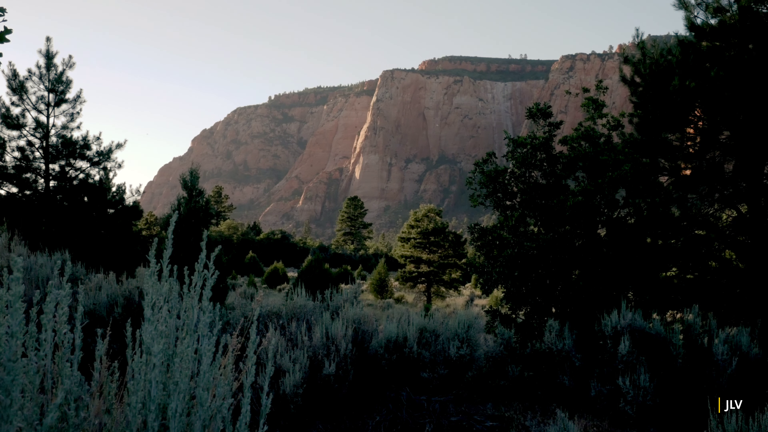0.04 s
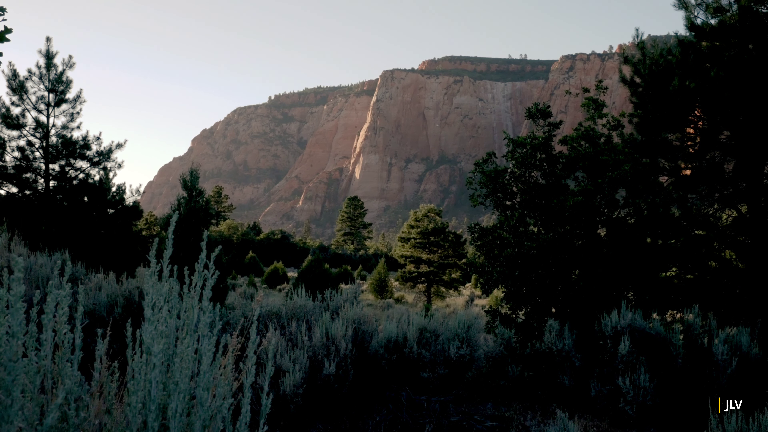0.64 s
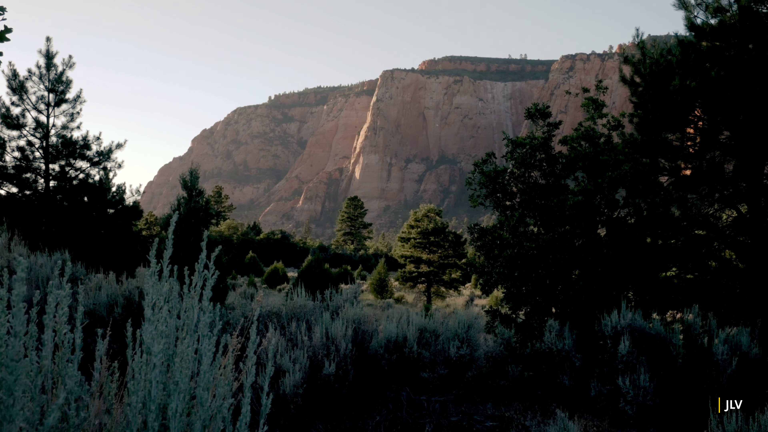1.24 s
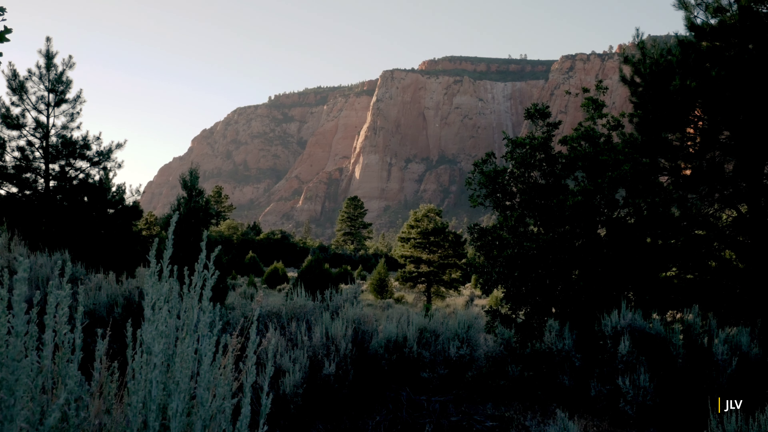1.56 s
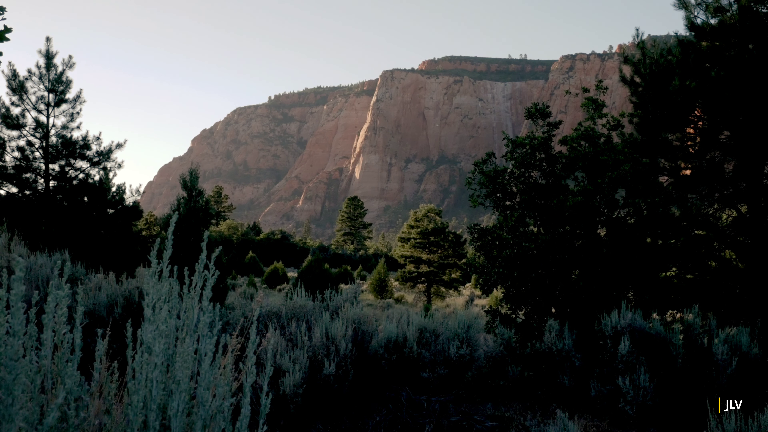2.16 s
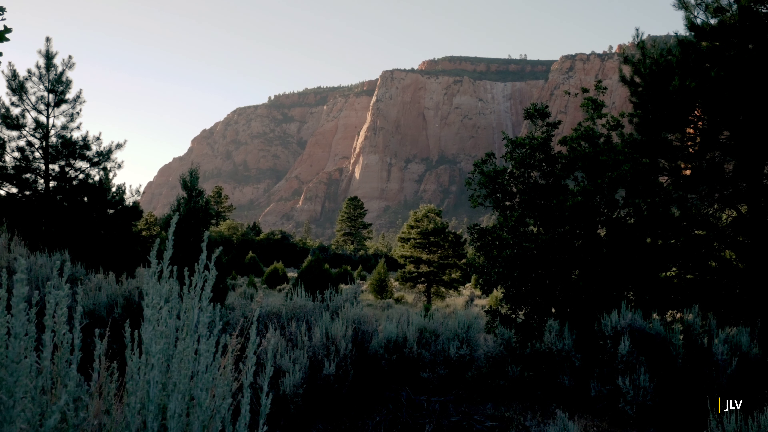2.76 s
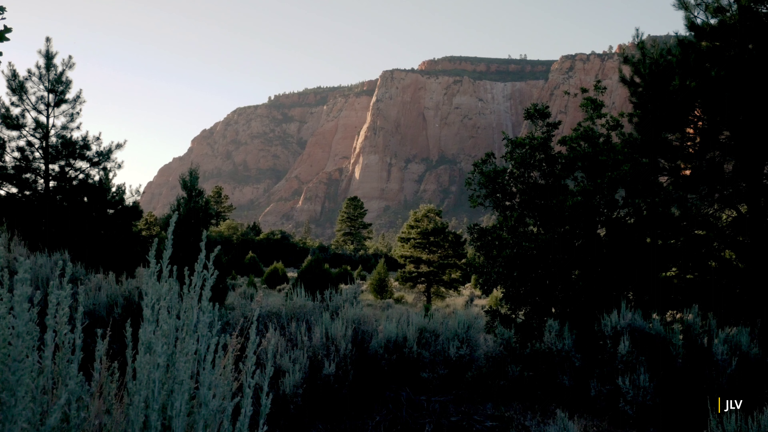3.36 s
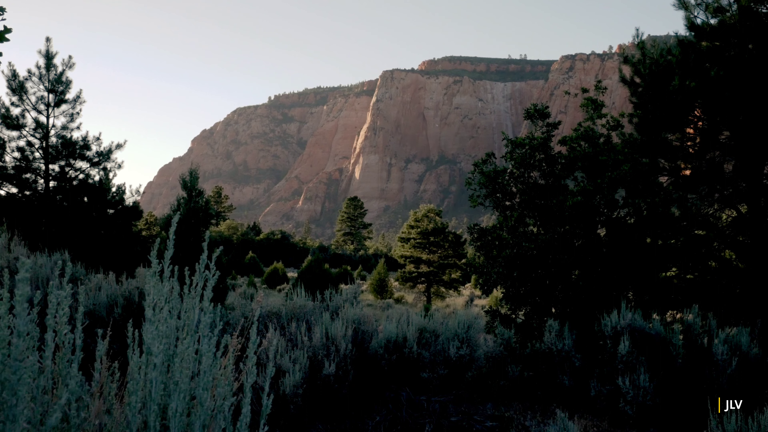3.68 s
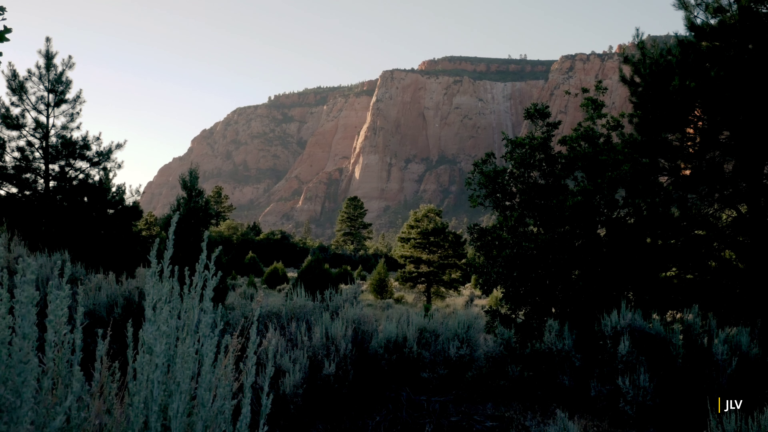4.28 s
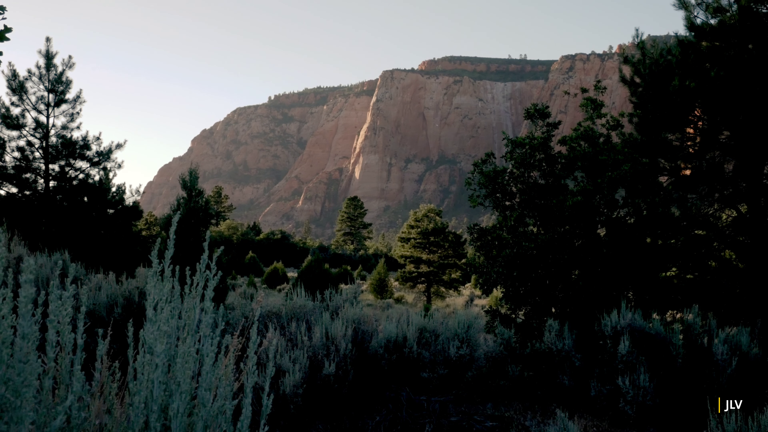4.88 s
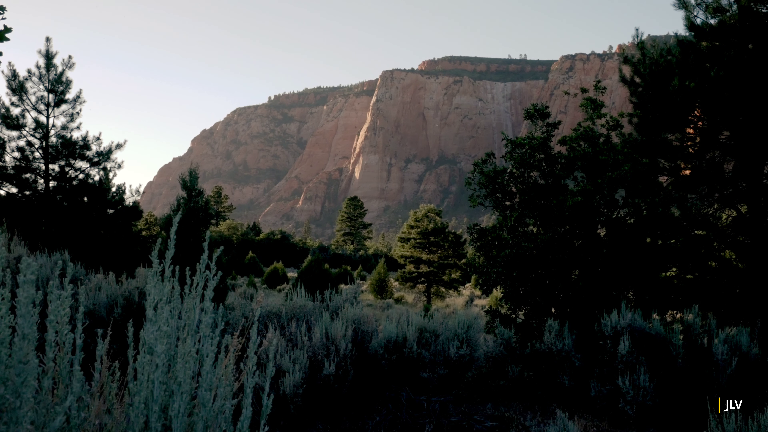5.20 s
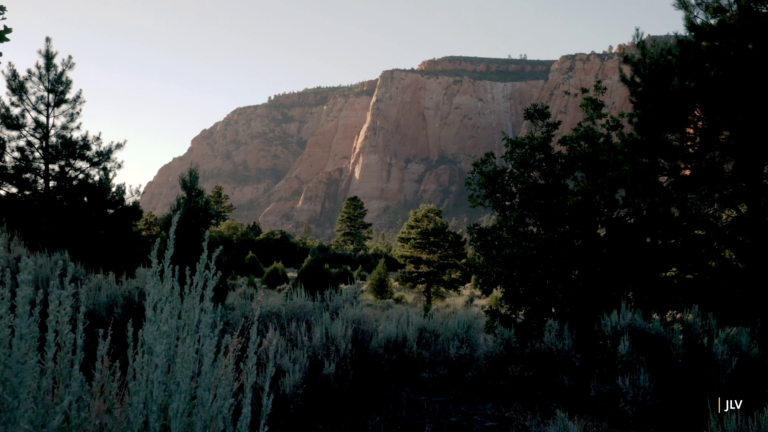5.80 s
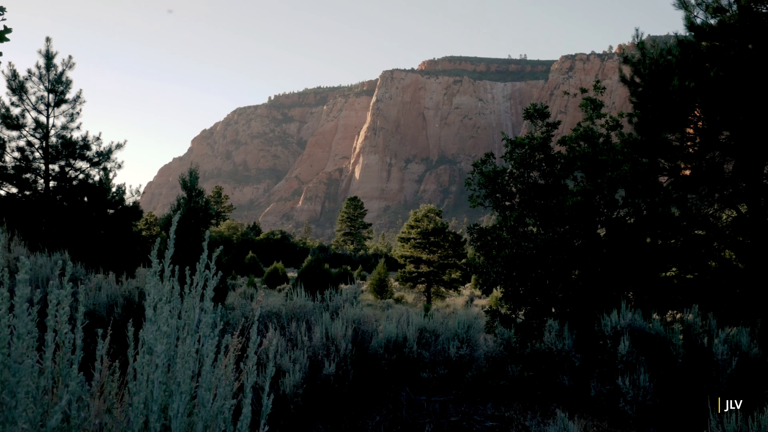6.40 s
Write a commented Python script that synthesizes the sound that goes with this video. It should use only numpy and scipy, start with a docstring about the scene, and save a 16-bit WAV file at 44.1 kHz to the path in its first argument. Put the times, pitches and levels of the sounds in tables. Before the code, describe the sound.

A faint cricket chirps at regular intervals among trees and brush, over steady microphone hiss, a soft wash of far-off air and a low hum. Wind begins to rumble on the microphone, growing into soft, irregular gusts. A small bird chirps twice in quick succession, each call rising and then dropping, while a distant one whistles two very faint notes. The canyon is very quiet, with its sounds toward the left.

```python
"""Faint far-off air, a low drone and a chirping cricket are heard first, in a quiet canyon.
Each chirp is four wing strokes that fall in pitch. From 1.5 s the eddies of a breeze buffet the
microphone. Near 4 s a small bird gives two rising, arched calls, one voice from each side of its
syrinx; a farther bird adds two faint notes. All lies to the left, over the recorder's even hiss."""
import sys
import numpy as np
from scipy import signal
from scipy.fft import rfft, irfft
from scipy.io import wavfile
from scipy.ndimage import uniform_filter1d

SR = 44100
rng = np.random.default_rng(int(sys.argv[2]) if len(sys.argv) > 2 else 0)


def inscribe(sig):
    """Save sig as 16-bit PCM at rate SR to the path in sys.argv[1].

    A 1-D sig is mono; a 2-D sig holds one channel per row.
    Samples are clipped to [-1, 1] before scaling.
    """
    pcm = np.round(np.clip(np.atleast_2d(sig).T, -1, 1) * 32767)
    wavfile.write(sys.argv[1], SR, pcm.astype(np.int16))


N = 284445
TIME, BINS = np.arange(N) / SR, np.fft.rfftfreq(N, 1 / SR)


def gain_of(db):
    """The decibel scale: 20 dB is a factor of ten in amplitude."""
    return 10 ** (np.asarray(db) / 20)


def colour(points):
    """Spectral envelope: a gain for each bin, from (Hz, dB) points joined along log frequency."""
    hz, db = np.transpose(points)
    return gain_of(np.interp(np.log(BINS + 1), np.log(hz + 1), db))


def coloured(x, gains):
    """Linear filtering: the spectrum is multiplied by the gains, and the result scaled to rms 1."""
    filtered = irfft(rfft(x) * gains, N)
    return filtered / np.sqrt(np.mean(filtered ** 2) + 1e-20)


def wander(bandwidth_hz):
    """Random modulation: low-passed noise of rms 1."""
    return coloured(rng.standard_normal(N), np.exp(-(BINS / bandwidth_hz) ** 2))


def add(mix, start_s, sound):
    """Superposition: a sound adds to the mix from start_s on."""
    part = mix[max(round(start_s * SR), 0):][:len(sound)]
    part += sound[:len(part)]


def whistle(hz, amplitude):
    """Frequency modulation: the phase of a sine is the running integral of its frequency."""
    return amplitude * np.sin(2 * np.pi * np.cumsum(hz) / SR)


def glide(length_s, level_db, pitch_hz, fall_hz, taper=2):
    """Linear sweep: a tone falls through pitch_hz as it swells and fades."""
    from_middle = np.linspace(-.5, .5, int(length_s * SR))
    envelope = abs(np.cos(np.pi * from_middle)) ** taper
    return whistle(pitch_hz - fall_hz * from_middle, gain_of(level_db) * envelope)


def among_trees(x, wet_db, t60_s, delay_s=0.009):
    """Reverberation: trunks and brush scatter a tail that decays exponentially."""
    t = np.arange(SR) / SR
    response = rng.standard_normal(SR) * gain_of(-60 * t / t60_s) * (t > delay_s)
    tail = signal.fftconvolve(x, response / np.linalg.norm(response))[:N]
    return x + gain_of(wet_db) * tail


def far_air(level_db=-62.0, swell_db=0.77):
    """Flow noise: air in distant trees makes a broadband wash that wavers slightly."""
    # spectrum of the wash: frequency_hz, density_db
    air_spectrum = [(20, -21), (60, -2.5), (120, -1.5), (300, 1), (480, 0.5), (750, -2.5), (1100, -8.5),
                    (1700, -14.5), (2600, -16), (4000, -19), (7000, -20), (15000, -22.5)]
    wash = coloured(rng.standard_normal(N), colour(air_spectrum))
    return gain_of(level_db + swell_db * wander(7.6)) * wash


def distant_drone(level_db=-62.0):
    """Resonance: noise confined to a few narrow low bands is heard as a drone."""
    # resonances of the drone: centre_hz, width_hz, peak_db
    resonances = [(118.5, 28, -1.5), (179, 29, -4.5), (207, 49, 3), (236, 43, -5.5)]
    bands = sum(gain_of(db) / (1 + ((BINS - hz) / width) ** 2) ** 2 for hz, width, db in resonances)
    return gain_of(level_db) * coloured(rng.standard_normal(N), bands)


def buffeting(gain_db=4.0, light_db=-54, strong_db=-45, onset_s=1.493, gust_db=1.26, bump_s=0.015):
    """Turbulence: eddies push on the microphone, with a spectrum set by the strength of the breeze."""
    # the breeze at the microphone: time_s, strength_db
    breeze = [(1.5, -67), (1.62, -61), (1.83, -65.5), (2.14, -62.5), (2.3, -55), (2.55, -53), (2.81, -48.5),
              (2.99, -53.5), (3.08, -47), (3.3, -47), (3.5, -44), (3.64, -47.5), (3.84, -47), (4.0, -52.5),
              (4.12, -43.5), (4.2, -48), (4.27, -56), (4.39, -51.5), (4.5, -43), (4.6, -43), (4.7, -47),
              (4.86, -45.5), (4.98, -51), (5.14, -47), (5.26, -45.5), (5.48, -45), (5.6, -45), (5.8, -45),
              (6.09, -52.5), (6.3, -43.5), (6.45, -49)]
    # single large eddies, rising above the breeze: time_s, rise_db
    bumps = [(1.759, 11), (2.309, 9), (2.67, 10), (2.79, 5), (3.885, 3.5)]
    # pressure spectra in a light and in a strong breeze: frequency_hz, density_db
    light_spectrum = [(10, -7), (25, -22), (45, -8.5), (75, -3.5), (105, -4.5), (150, -10), (220, -21),
                      (320, -26.5), (600, -38), (1500, -59.5)]
    strong_spectrum = [(10, -22), (25, -13), (45, -2), (70, -0.5), (105, -.5), (150, -5), (220, -14.5),
                       (320, -23.5), (600, -39), (1500, -62)]
    strength_db = np.interp(TIME, *np.transpose(breeze)) + gust_db * wander(14)
    strength_db += sum(db * np.exp(-((TIME - time_s) / bump_s) ** 2) for time_s, db in bumps)
    strong_share = np.clip((strength_db - light_db) / (strong_db - light_db), 0, 1)
    eddies = rng.standard_normal(N)
    pressure = (1 - strong_share) * coloured(eddies, colour(light_spectrum))
    pressure += strong_share * coloured(eddies, colour(strong_spectrum))
    # over a few eddies the rms pressure follows the strength of the breeze
    pressure /= np.sqrt(uniform_filter1d(pressure ** 2, size=5000) + 1e-9)
    arrival = np.clip((TIME - onset_s) / .06, 0, 1)
    return gain_of(strength_db + gain_db) * pressure * arrival


def cricket(roughness=0.15, uneven_db=0.85, uneven_hz=35):
    """Stridulation: each stroke rings the wings; the pitch falls as the scraper slows along the file."""
    # the chirps: start_s, level_db, pitch_hz, growth_per_stroke_db
    chirps = [(.037, -60, 4880, -0.5), (.861, -56.5, 4860, -.3), (1.828, -59.7, 4890, .1),
              (2.660, -60, 4880, -1), (3.361, -60, 4920, -.1), (4.143, -64, 4860, .6),
              (5.048, -64.5, 4870, 1), (5.814, -63, 4920, 0)]
    # closing wing strokes of every chirp: delay_s, length_s, accent_db, shift_hz, fall_hz
    strokes = [(0, .023, -.7, -20, 720), (0.034, .025, 0.8, 23, 850), (0.069, .028, 0.1, -1, 700),
               (0.102, .029, 0, -3, 645)]
    out = np.zeros(N)
    from_middle = np.arange(len(strokes)) - (len(strokes) - 1) / 2
    for start_s, level_db, pitch_hz, growth_db in chirps:
        for k, (delay_s, length_s, accent_db, shift_hz, fall_hz) in zip(from_middle, strokes):
            force, tuning = rng.standard_normal(2)
            stroke_db = level_db + accent_db + growth_db * k + uneven_db * force
            stroke_hz = pitch_hz + shift_hz + uneven_hz * tuning
            add(out, start_s + delay_s - length_s / 2, glide(length_s, stroke_db, stroke_hz, fall_hz))
    return out * (1 + roughness * wander(300))


def far_bird():
    """Pure-tone song: a farther bird whistles faint, plain, falling notes."""
    # the notes: start_s, length_s, level_db, pitch_hz, fall_hz
    notes = [(1.944, 0.052, -69.5, 1905, 30), (4.048, 0.114, -68, 1465, 141)]
    out = np.zeros(N)
    for start_s, *note in notes:
        add(out, start_s, glide(*note, taper=1))
    return out


def near_bird(quaver=0.005, trill_hz=130, trill_s=.05, flick_s=0.021):
    """Biphonation: each side of the syrinx whistles its own unsteady arch of pitch."""
    # the calls, with each voice's level and its change over the call:
    # start_s, length_s, low_db, low_change_db, high_db, high_change_db, flick_db, trill_depth_hz
    calls = [(3.691, .148, -51, -20, -69, 8, -65, 85), (4.003, .135, -60, 6, -58, -2.5, -59, 40)]
    # the arch of each voice: share_of_call, pitch_hz, relative_db
    low_voice = [(0, 3326, -21), (.1, 3520, -8), (.17, 3680, -1), (.37, 3840, -1), (.44, 3900, -3),
                 (.53, 3820, -6), (.62, 3400, -12), (.87, 2510, -11)]
    high_voice = [(.05, 3690, -12), (.22, 3970, 0), (.31, 4270, 3), (.38, 4500, -4), (.46, 4800, -2),
                  (.57, 5040, -4), (.73, 5060, -7), (.87, 4700, -19)]
    out = np.zeros(N)
    unsteady = 1 + quaver * wander(250)
    for start_s, length_s, low_db, low_change_db, high_db, high_change_db, flick_db, depth_hz in calls:
        voices = (low_voice, low_db, low_change_db), (high_voice, high_db, high_change_db)
        for arch, voice_db, change_db in voices:
            share, pitch_hz, relative_db = np.transpose(arch)
            points_s = start_s + share * length_s
            t = np.arange(points_s[0], points_s[-1], 1 / SR)
            age_s = t - start_s
            # a fast trill roughens the opening of the call, then settles
            trill = depth_hz * np.exp(-(age_s / trill_s) ** 4) * np.sin(2 * np.pi * trill_hz * age_s)
            hz = np.interp(t, points_s, pitch_hz) * np.interp(t, TIME, unsteady) + trill
            amplitude = gain_of(voice_db + np.interp(t, points_s, relative_db + change_db * share))
            add(out, points_s[0], whistle(hz, amplitude * signal.windows.tukey(len(t), .1)))
        # the high voice ends in a quick downward flick
        add(out, start_s + length_s - flick_s, glide(flick_s, flick_db, pitch_hz=4370, fall_hz=950))
    return out


def scene(right_db=-10.5, bird_roughness=0.18):
    """Level panning: the sources add, and a weaker right channel places them all to the left."""
    chirping = among_trees(cricket(), wet_db=-10.5, t60_s=0.23)
    birds = (far_bird() + near_bird()) * (1 + bird_roughness * wander(300))
    birdsong = among_trees(birds, wet_db=-9.0, t60_s=0.28)
    mix = far_air() + distant_drone() + buffeting() + chirping + birdsong
    return mix * gain_of([[0], [right_db]])


def record(dry, hiss_db=-60.0, left_extra_db=0.66, cutoff_hz=15490):
    """Self-noise and bandwidth: each channel adds its own hiss, then passes a low-pass filter."""
    # spectrum of the recorder's hiss: frequency_hz, density_db
    hiss_spectrum = [(20, 4.5), (100, 1), (400, 1.5), (1000, 0), (1800, -1), (3000, 0), (5000, 0.1),
                     (9000, -0.5), (15000, -0.3)]
    hiss = np.array([coloured(rng.standard_normal(N), colour(hiss_spectrum)) for _ in dry])
    noisy = dry + hiss * gain_of([[hiss_db + left_extra_db], [hiss_db]])
    low_pass = signal.firwin(1023, cutoff_hz, window=("kaiser", 9), fs=SR)
    return signal.oaconvolve(noisy, low_pass[None], "same")


dry = scene()
out = record(dry)
inscribe(out)
```